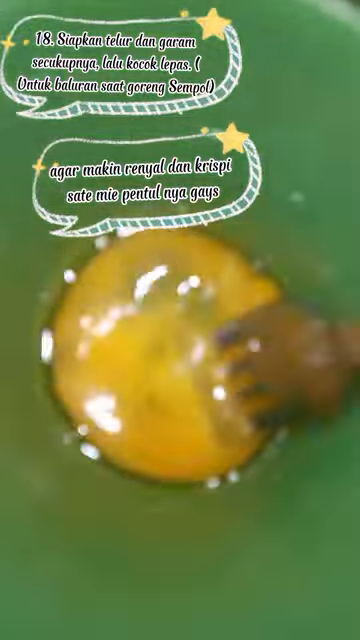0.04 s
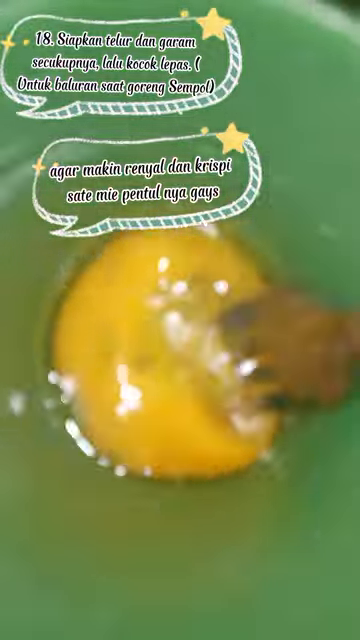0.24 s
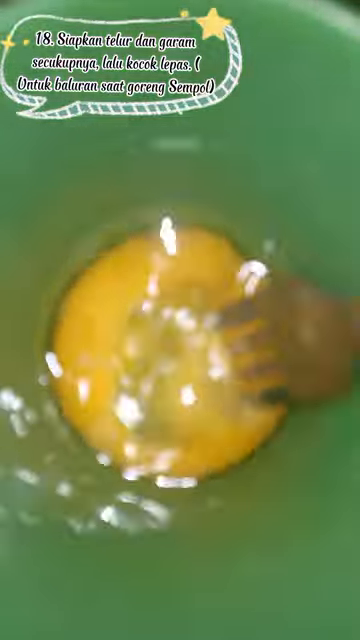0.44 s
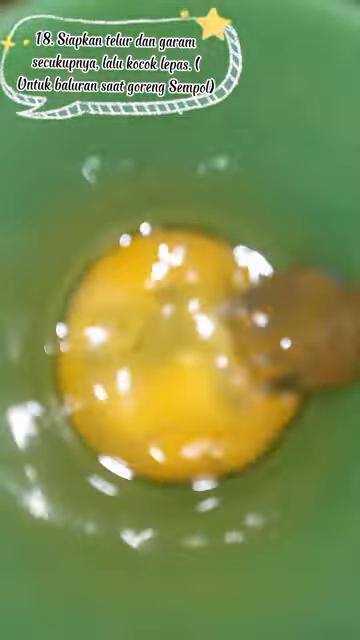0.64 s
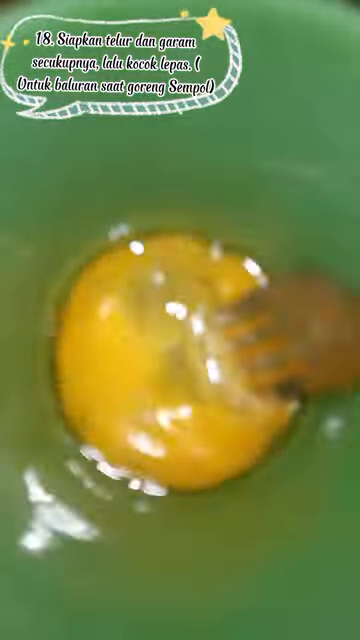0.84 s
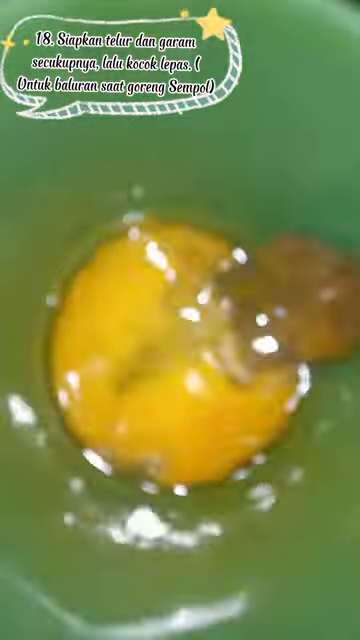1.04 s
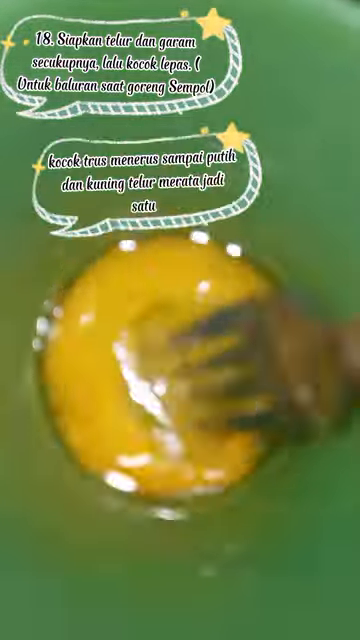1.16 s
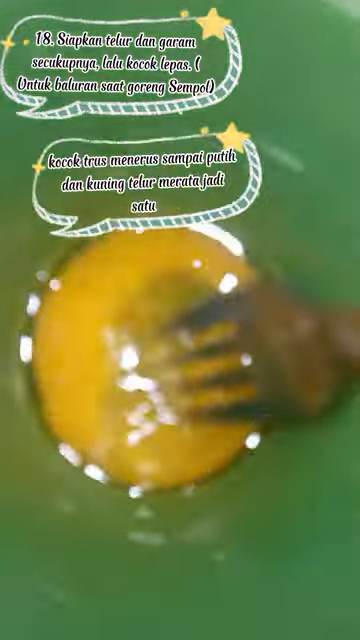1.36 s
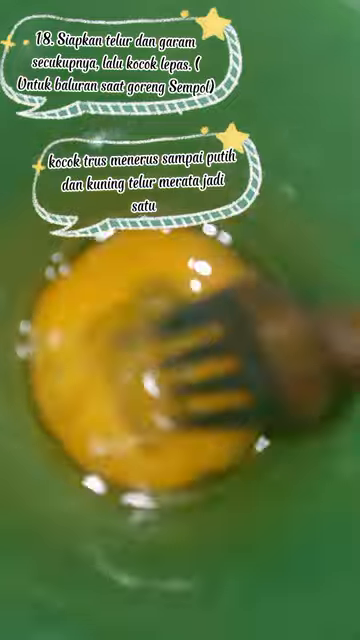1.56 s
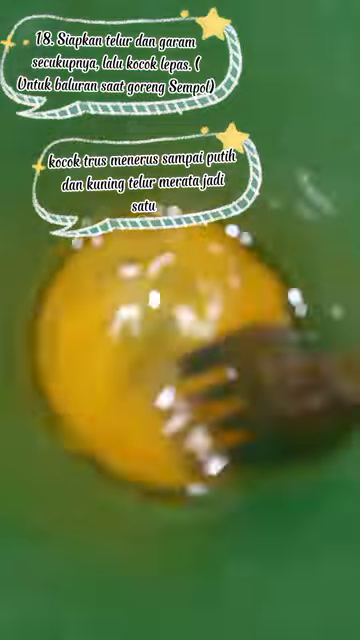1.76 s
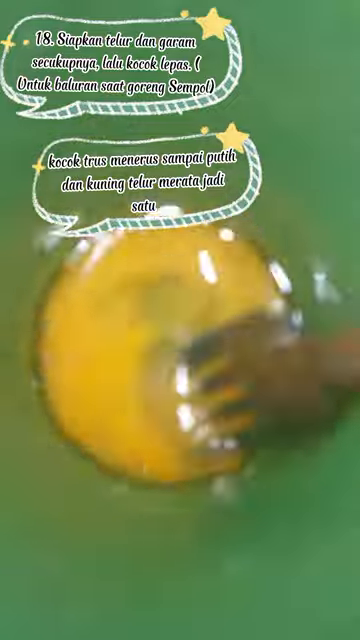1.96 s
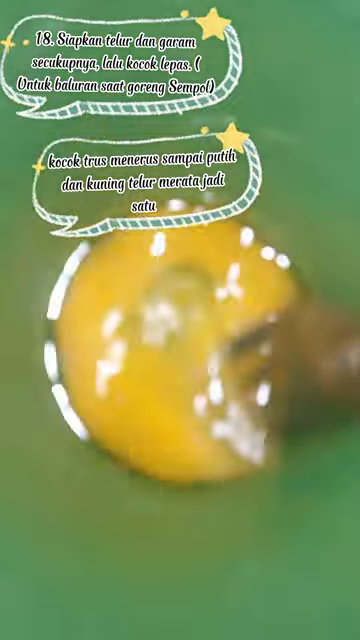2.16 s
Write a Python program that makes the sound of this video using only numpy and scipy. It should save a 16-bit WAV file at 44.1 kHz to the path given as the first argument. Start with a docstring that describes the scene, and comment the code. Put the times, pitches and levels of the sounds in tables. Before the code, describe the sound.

A fork beats raw eggs in a plastic bowl from the start to about 2.2 seconds, nearly five strokes a second. Each stroke scrapes briefly and clacks dry and hollow, often after a lighter wall tap; the first clacks, until 0.5 seconds, are loudest. Egg sloshes throughout, with plops near 0.7, 1.1, 1.3 and 1.7 seconds. Soft table bumps follow 1.1 seconds, over faint kitchen hum and thin whine.

```python
"""A kitchen, with a phone close to a plastic bowl in which a fork beats raw eggs, nearly five strokes a second.
Tine tips tap the wall, skid onto the bottom and clack flat: each contact is a burst of decaying bowl and
fork modes. The egg plops and sloshes as short gliding bubbles, and the bowl bumps softly on the table.
Decaying noise makes the kitchen's short tail; shaped noise and a sine make the steady hum and thin whine."""
import sys
import numpy as np
from scipy import signal
from scipy.fft import rfft, irfft
from scipy.io import wavfile
from scipy.ndimage import uniform_filter1d

SR = 44100
rng = np.random.default_rng(int(sys.argv[2]) if len(sys.argv) > 2 else 0)


def pcm_store(signal):
    """Save signal as 16-bit PCM."""
    levels = np.round(np.clip(np.atleast_2d(signal), -1, 1) * 32767)
    wavfile.write(sys.argv[1], SR, levels.astype(np.int16).T)


def gain_from_db(level_db):
    """Convert decibel levels to linear amplitude factors (20 dB per decade)."""
    decades = np.asarray(level_db, float) / 20
    return 10 ** decades


N = 97064  # length [samples]
TAP, SKID, CLACK = 0, 1, 2  # kinds of contact


def add(out, sound, start):
    """Lays a sound into the take at start [s]."""
    first = int(start * SR)
    count = min(len(sound), len(out) - first)
    out[first:first + count] += sound[:count]


def peak(sound, db):
    """Scales a sound to a peak level [dB]."""
    return sound * gain_from_db(db) / np.abs(sound).max()


def curve(points, hz):
    """Level [dB] at each hz, read from a table of (frequency [Hz], level [dB]) on a log frequency axis."""
    table = np.array(points)
    return np.interp(np.log(hz), np.log(table[:, 0]), table[:, 1])


def bubble(hz, cycles, glide):
    """A soft swell that rings a few cycles; its pitch rises with positive glide and falls with negative."""
    u = np.arange(int(3 * cycles / hz * SR)) / SR * hz / cycles
    swell = u * np.exp(-2.2 * u ** 2.9)
    return np.sin(2 * np.pi * cycles * (u + glide * u ** 2 / 2)) * swell


def ring(modes, db, scatter_db, detune, alternate=True, pitch=1):
    """Decaying modes, one row each, struck at a slightly different spot every time."""
    table, t = np.array(modes), np.arange(SR // 6) / SR
    pitch_draw, level_draw = rng.standard_normal((2, len(table), 1))
    hz = table[:, :1] * (pitch + detune * pitch_draw)
    polarity = -np.ones((len(table), 1))
    if alternate:
        polarity[1::2] = 1
    size = polarity * gain_from_db(db[:, None] + scatter_db * level_draw)
    decay = np.exp(-np.log(1000) * t / table[:, 1:2])
    return size * np.sin(2 * np.pi * hz * t) * decay


# colour of the room's noise ahead of the microphone: (frequency [Hz], relative density [dB])
HUM_COLOUR = [(40, -6), (110, 6.5), (300, 3), (2000, -8.5), (4000, -20), (6300, -33), (13500, -25),
              (15200, -8), (15700, -20)]


def hum():
    """Steady kitchen noise: white noise weighted by frequency, then set to one rms level."""
    level_db = -56.5
    hz = np.arange(N // 2 + 1) * SR / N + 1
    noise = irfft(rfft(rng.standard_normal(N)) * gain_from_db(curve(HUM_COLOUR, hz)), N)
    return gain_from_db(level_db) * noise / noise.std()


def whine():
    """A thin electronic whine: one steady, faint sine."""
    level_db, hz = -82, 7590
    return gain_from_db(level_db) * np.sin(2 * np.pi * hz * np.arange(N) / SR)


EGG_GLIDE = 0.12  # upward pitch glide of gulps and plops


def gulps():
    """The egg sloshes: many small rising bubbles, calming down after each fork contact."""
    base_db, scatter_db, settle_db_per_s = -58.5, 11, 56
    per_s, middle_hz, cycles = 110, 330, 2.1
    out = np.zeros(N)
    # the first entry is a stir before the take begins
    stirs = np.array([-.15] + [row[0] for row in WALL_TAPS + BOTTOM_SKIDS + FLAT_CLACKS])
    for when, pitch, size in rng.random((1000, 3)):
        start = when * 1000 / per_s
        if start < N / SR:
            hz = middle_hz * 2 ** (2.4 * (pitch - .5))
            since_stir = start - stirs[stirs < start].max()
            db = base_db - settle_db_per_s * since_stir - scatter_db * np.log(.05 + size)
            add(out, bubble(hz, cycles, EGG_GLIDE) * gain_from_db(db), start)
    return out


# kitchen tail by band: (centre frequency [Hz], t60 [s], level [dB])
KITCHEN_BANDS = [(110, 0.26, -7.5), (318, 0.33, -4.5), (740, 0.47, -7.5), (1350, 0.25, -9.5),
                 (2967, 0.27, -14.5), (3650, 0.19, -15), (4700, 0.33, -15)]


def kitchen(near):
    """The room answers with diffuse noise that dies band by band, in uneven clusters of echoes."""
    onset_ms, grain_db = 2.4, 3
    bands, t = np.array(KITCHEN_BANDS), np.arange(SR // 2) / SR
    hz = np.arange(len(t) // 2 + 1) * SR / len(t) + 1
    grain_t = t[::SR // 200]
    tail = np.zeros(len(t))
    for k, (_, t60, db) in enumerate(bands):
        # each band fades into its neighbours' centres
        weight = np.interp(np.log(hz), np.log(bands[:, 0]), (np.arange(len(bands)) == k).astype(float))
        fade = np.exp(-np.log(1000) * t / t60) * (1 - np.exp(-t * 1000 / onset_ms))
        fade = fade * gain_from_db(grain_db * np.interp(t, grain_t, rng.standard_normal(len(grain_t))))
        noise = irfft(rfft(rng.standard_normal(len(t))) * weight, len(t))
        tail += noise * fade * gain_from_db(db) / np.sqrt(np.sum(fade ** 2))
    return signal.fftconvolve(near, tail)[:N]


# low modes of the bowl with egg in it, relative levels:
# (frequency [Hz], t60 [s], tap level [dB], skid level [dB], clack level [dB])
BODY_MODES = [(112, 0.1, -15, -8.5, -11), (279, 0.03, -3.5, -2, -12.5), (466.5, 0.059, -3.5, -6, -5.5),
              (638, 0.04, -4.5, -10, -6.5), (778, 0.012, 4.5, 4, 7), (1047.4, 0.031, -5.5, -4.5, -4.5)]
# high modes of bowl and fork, same columns:
# (frequency [Hz], t60 [s], tap level [dB], skid level [dB], clack level [dB])
RING_MODES = [(1630, 0.005, -15, 12.5, -44), (1919, 0.023, -59, -0.5, -7), (2208, 0.028, -59, -6.5, -53),
              (3224, 0.014, -4, 5, -1), (4496, 0.011, -36, 5.5, -7), (5136, 0.012, -11, -14, -22.5),
              (6010, 0.0071, -5.5, 0.5, -13.5), (6960, 0.0032, -11.5, -4.5, -11),
              (10060, 0.0029, 0.5, 3, -16.5), (11320, 0.0069, -15.5, -31, -23.5),
              (14600, 0.0078, 11, 2, -20), (4280, 0.013, -14.5, -28, -46)]
# one row each for tap, skid, clack:
# (build-up [ms], lag of the body [ms], chatter of the tines [dB], time after which egg chokes the ring [ms])
CONTACT_KINDS = [(0.39, 0.08, 1.4, 13), (1, 0.54, 8, 8.4), (0.32, 0.87, 3.5, 4.5)]
# broad crack under the high modes, relative: (tap level [dB], skid level [dB], clack level [dB])
CRACK_LEVELS = (-17, -10, -13)


def contact(out, start, ring_db, body_db, kind, colour_db):
    """One fork contact rings the high modes sharply and pushes the body of the bowl softly."""
    push_ms, crack_ms, chatter_ms, crack_hz = 0.55, 7.5, 0.26, 6130
    body_rise_cycles = 0.47
    dry_wall_pitch = 1.03  # modes sit higher where no egg loads the wall
    high, low = np.array(RING_MODES), np.array(BODY_MODES)
    rise_ms, lag_ms, chatter_db, wet_ms = CONTACT_KINDS[kind]
    ms = np.arange(SR // 6) * 1000 / SR
    chatter_noise, crack_noise = rng.standard_normal((2, len(ms)))

    width = int(chatter_ms * SR / 1000) + 1
    chatter = np.sqrt(width) * uniform_filter1d(uniform_filter1d(chatter_noise, width), width)
    shape = (1 - np.exp(-ms / rise_ms)) * np.exp(-(ms / wet_ms) ** 2) * gain_from_db(chatter_db * chatter)
    pitch = dry_wall_pitch if kind == TAP else 1
    rows = ring(RING_MODES, high[:, 2 + kind] + colour_db, 1, .008, pitch=pitch)
    dull = signal.butter(4, crack_hz, fs=SR, output="sos")
    crack = gain_from_db(CRACK_LEVELS[kind]) * signal.sosfilt(dull, crack_noise) * np.exp(-ms / crack_ms)
    top = high[:, 0] > 9000
    main = shape * (rows[~top].sum(axis=0) + crack)
    treble = shape * rows[top].sum(axis=0)
    # twice the rms of the loudest 2 ms, leaving the treble out, sets the ring level
    loudest = np.sqrt(4 * uniform_filter1d(main ** 2, size=SR // 500).max())
    add(out, (main + treble) * gain_from_db(ring_db) / loudest, start)

    push = np.hanning(int(push_ms * SR / 1000) + 3)
    body = signal.fftconvolve(ring(BODY_MODES, low[:, 2 + kind], 2, .035, alternate=False), push[None])
    # the egg-laden body swells up, low modes last
    swell = 1 - np.exp(-ms / 1000 * low[:, :1] / body_rise_cycles)
    body = (body[:, :len(ms)] * swell).sum(axis=0)
    add(out, peak(body, body_db), start + lag_ms / 1000)


# skids onto the bottom, close to the microphone:
# (time [s], ring level [dB], body peak level [dB], gain of the modes over 10 kHz [dB])
BOTTOM_SKIDS = [(0.0627, -27.5, -25.5, 3), (0.2704, -28, -25.5, 3), (0.4866, -28.5, -26.5, -2),
                (0.6898, -27, -29.5, -3), (0.9039, -27.5, -27, -2), (1.1059, -23, -32, -10),
                (1.1524, -26.5, -27.5, -4), (1.3339, -23, -26.5, 0), (1.5365, -21.5, -24, 1),
                (1.7612, -27.5, -23, -3), (1.961, -23.5, -24.5, 7), (1.9881, -25, -26.5, -12),
                (2.1662, -20.5, -25.5, 1)]


def skids():
    """Tine tips skid onto the bottom: a slower build-up and the strongest chatter."""
    out, top = np.zeros(N), np.array(RING_MODES)[:, 0] > 9000
    for start, ring_db, body_db, top_db in BOTTOM_SKIDS:
        contact(out, start, ring_db, body_db, SKID, top_db * top)
    return out


# flat clacks of the tines, close to the microphone:
# (time [s], ring level [dB], body peak level [dB], gain of the 1.9 kHz mode [dB])
FLAT_CLACKS = [(0.0871, -13, -24, 2.5), (0.302, -13.5, -23.5, 1), (0.5102, -14, -25.5, 1.9),
               (0.7103, -17.5, -26.5, -1), (0.7318, -15.5, -25, 0), (0.9116, -18, -23, 0.5),
               (0.939, -20, -30, 2.5), (1.159, -15.5, -24.5, 1.8), (1.339, -19.5, -22.5, -11),
               (1.5497, -19.5, -21.5, 0.5), (1.567, -20, -31.5, 5.5), (1.7769, -17.5, -24.5, 0.5),
               (1.9977, -17.5, -28, -1.5)]


def clacks():
    """Tines clack flat: a fast build-up that the egg soon chokes."""
    out, second = np.zeros(N), np.arange(len(RING_MODES)) == 1
    for start, ring_db, body_db, second_db in FLAT_CLACKS:
        contact(out, start, ring_db, body_db, CLACK, second_db * second)
    return out


# tip taps on the wall, close to the microphone:
# (time [s], ring level [dB], body peak level [dB], gain of the modes over 10 kHz [dB])
WALL_TAPS = [(0.2426, -40.5, -41, -4.5), (0.4522, -30.5, -31.5, -0.5), (0.654, -28, -31, -4.5),
             (0.861, -29, -29, -2.5), (1.06, -23.5, -26.5, -2.5), (1.278, -25.5, -27, -2),
             (1.498, -34.5, -35.5, -5), (1.6882, -22.5, -24.5, -2.7)]


def taps():
    """Tine tips tap the wall: little chatter, higher modes and the longest ring before the choke."""
    out, top = np.zeros(N), np.array(RING_MODES)[:, 0] > 9000
    for start, ring_db, body_db, top_db in WALL_TAPS:
        contact(out, start, ring_db, body_db, TAP, top_db * top)
    return out


# plops of egg folding over in the bowl: (time [s], peak level [dB], frequency [Hz])
EGG_PLOPS = [(0.675, -37, 235), (1.088, -33, 266), (1.3, -37, 257), (1.724, -31, 330)]


def plops():
    """Egg folds over: a rising bubble, with a wet splat that rings the bowl's low modes."""
    cycles, splat_db = 1.83, -3  # splat level is relative to the plop
    out, clack_db = np.zeros(N), np.array(BODY_MODES)[:, 4]
    for start, db, hz in EGG_PLOPS:
        add(out, peak(bubble(hz, cycles, EGG_GLIDE), db), start - .5 / hz)
        splat = ring(BODY_MODES, clack_db, 2, .05).sum(axis=0)
        add(out, peak(splat, db + splat_db), start)
    return out


# soft bumps of the bowl on the table: (time [s], peak level [dB], frequency [Hz])
TABLE_THUMPS = [(1.116, -33, 115), (1.405, -33, 135), (1.612, -35, 135)]


def thumps():
    """The bowl bumps softly on the table: a short low swell that falls in pitch."""
    out = np.zeros(N)
    for start, db, hz in TABLE_THUMPS:
        add(out, -peak(bubble(hz, 1.7, -0.35), db), start - .5 / hz)  # cycles, glide
    return out


def scene():
    """Fork, egg and bowl in the kitchen, over the hum and the whine."""
    near = gulps() + skids() + clacks() + taps() + plops() + thumps()
    return (near + kitchen(near) + hum() + whine())[None]


# response of the phone's microphone: (frequency [Hz], gain [dB])
MIC_RESPONSE = [(20, -21), (62, 5), (6900, -0.5), (8400, -16), (16300, -23), (17000, -68)]


def microphone(sound):
    """The phone loses the deep bass and most of the top, through a minimum-phase filter."""
    hz = np.arange(2049) * SR / 4096 + 1
    cepstrum = irfft(np.log(gain_from_db(curve(MIC_RESPONSE, hz))))
    # folding the cepstrum forward makes the filter minimum phase
    cepstrum[1:2048] *= 2
    cepstrum[2049:] = 0
    return signal.fftconvolve(sound, irfft(np.exp(rfft(cepstrum))))[:N]


def top_cut(x):
    """Nothing passes above the cut-off."""
    return signal.sosfilt(signal.butter(12, 16660, fs=SR, output="sos"), x)


def record(dry):
    """The phone close to the bowl hears the scene through its microphone."""
    heard = microphone(dry[0])[None]
    return top_cut(heard)


dry = scene()
out = record(dry)
pcm_store(out)
```